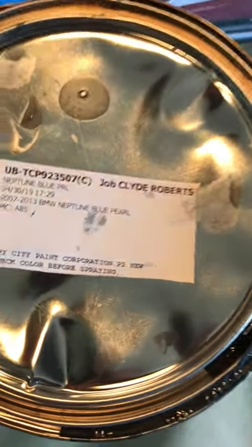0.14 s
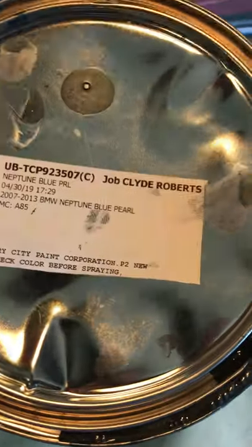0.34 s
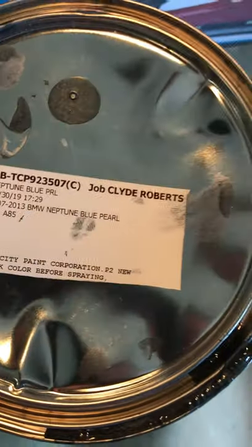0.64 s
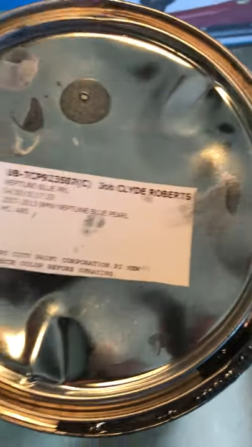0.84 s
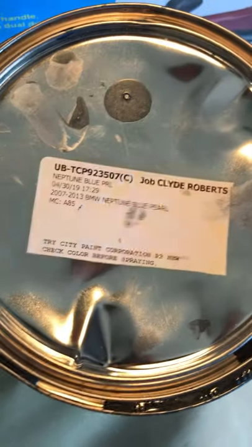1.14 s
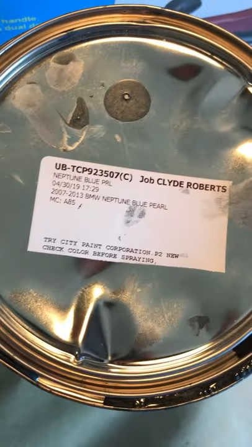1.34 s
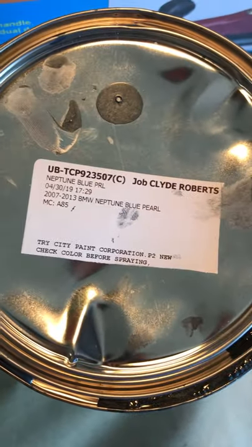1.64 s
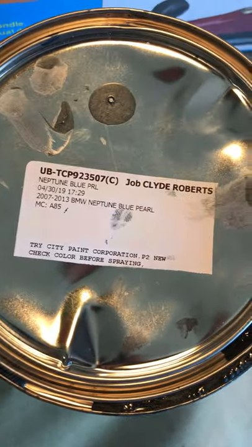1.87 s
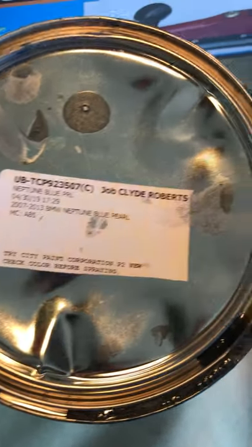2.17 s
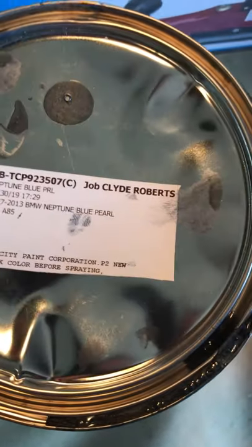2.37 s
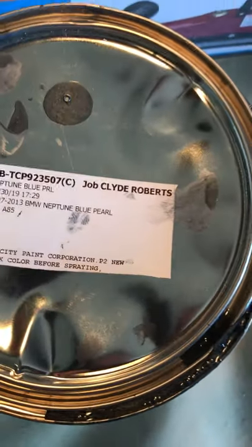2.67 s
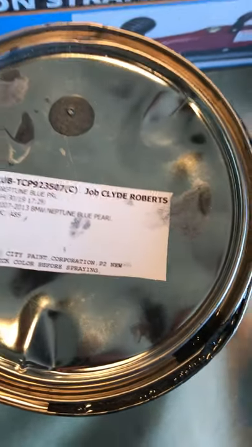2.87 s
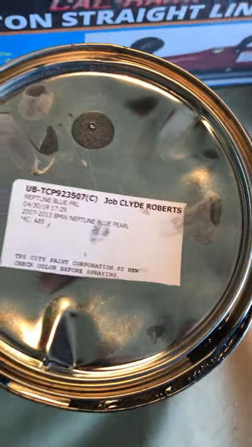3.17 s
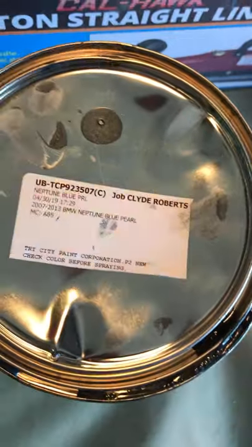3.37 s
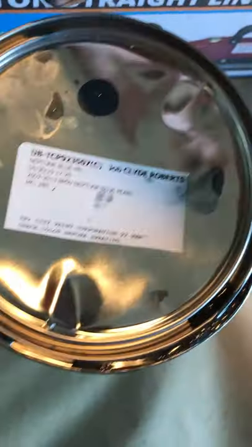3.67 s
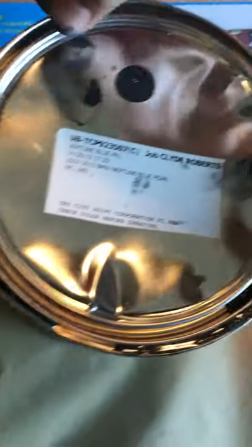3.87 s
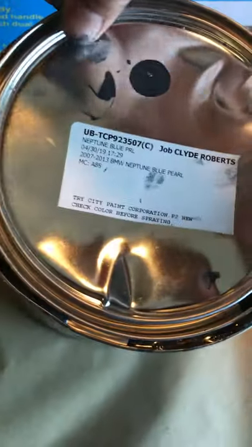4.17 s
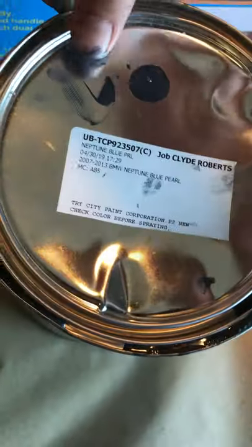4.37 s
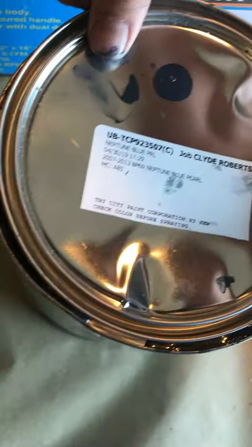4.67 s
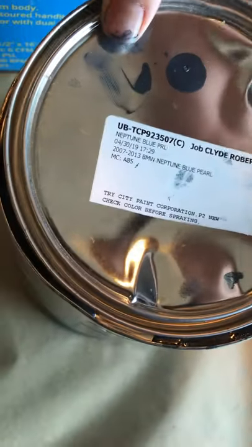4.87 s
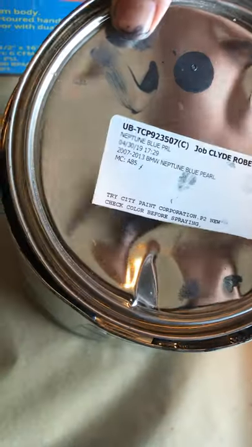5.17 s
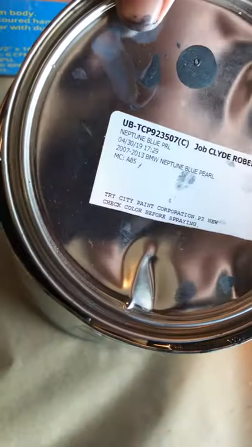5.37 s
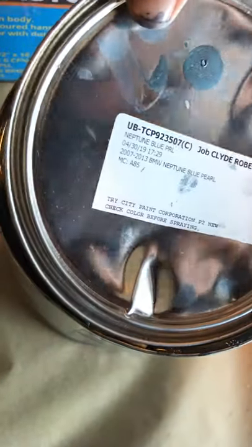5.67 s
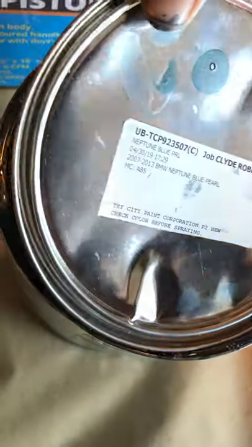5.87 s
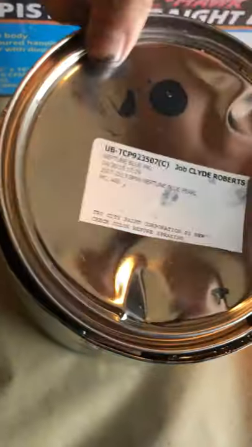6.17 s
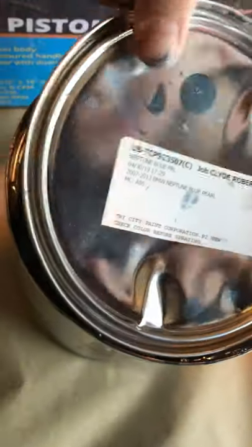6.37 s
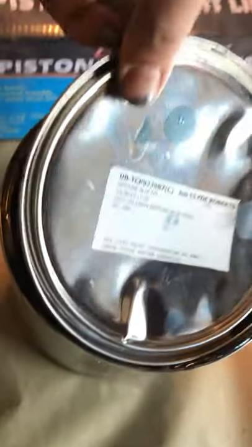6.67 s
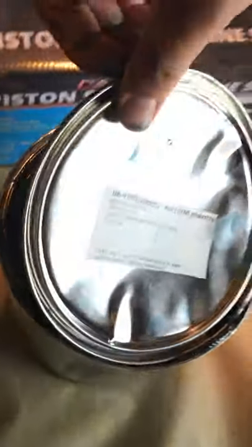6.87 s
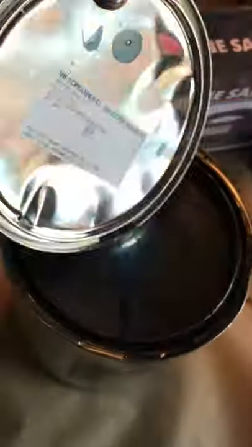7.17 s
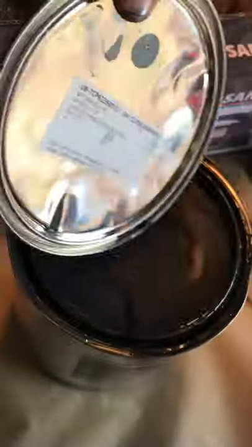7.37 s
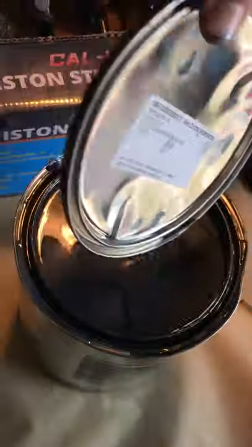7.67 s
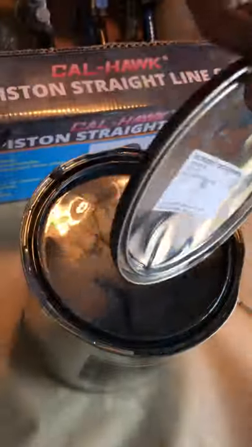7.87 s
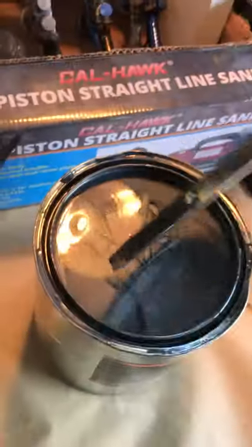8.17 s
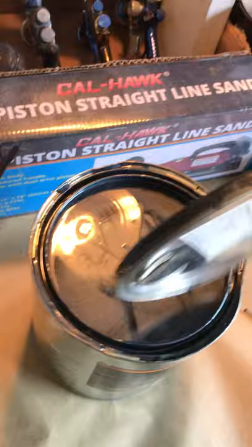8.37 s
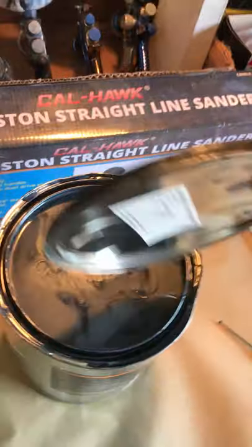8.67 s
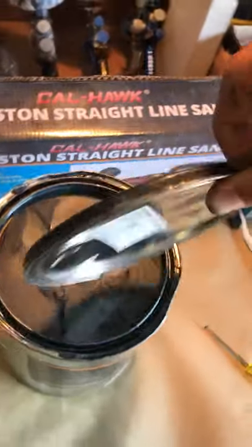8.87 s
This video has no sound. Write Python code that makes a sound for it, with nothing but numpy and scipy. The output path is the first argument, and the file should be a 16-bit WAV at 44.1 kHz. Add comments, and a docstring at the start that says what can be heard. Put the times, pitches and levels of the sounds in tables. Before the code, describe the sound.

Close dull tinny thumps and clicks on a metal can, a short clatter, quiet rubbing, then a sharp lid pop in a quiet workshop.

```python
"""A quiet workshop: a hand works the lid off a metal paint can, close to a phone microphone.
Each contact is a burst of tiny slips that rings modes of the tin and bench and adds clicks and ticks.
Rubs are shaped noise with a hum, among them a low bench ring and a short tap; faint rings join them.
A tool clatters a little further off, with more of the room's echo, as noise bursts without a ring.
Behind it all lie a low lumpy rumble and the hiss of the room, both shaped noise."""
import sys
import numpy as np
from scipy import signal
from scipy.fft import rfft, irfft
from scipy.io import wavfile
from scipy.ndimage import uniform_filter1d

SR = 44100
rng = np.random.default_rng(int(sys.argv[2]) if len(sys.argv) > 2 else 0)


def transcribe(signal):
    """Save signal, clipped to [-1, 1], as a 16-bit WAV file at the path in sys.argv[1]."""
    frames = np.atleast_2d(signal).T
    limited = np.clip(frames, -1, 1)
    pcm = np.round(limited * 32767).astype(np.int16)
    wavfile.write(sys.argv[1], SR, pcm)


N = 398223  # samples, about 9 s

# Contacts of hand, lid and can. Each row: start in seconds, then ring, thump, click and tick
# levels in dB, and t60 of the slips in seconds.
CONTACTS = [(0.154, -30, -35, -37.5, -55, 0.079), (0.355, -27.5, -23, -41, -61, 0.083),
            (0.367, -18, -12, -38.5, -69, 0.077), (0.422, -33, -39, -34, -44, 0.055),
            (0.509, -36, -43, -45.5, -57, 0.075), (0.771, -18.5, -17, -33.5, -45, 0.057),
            (1.208, -33.5, -42, -31, -35.5, 0.066), (1.234, -58, -68, -38.5, -64, 0.058),
            (1.738, -42.5, -55, -46, -51, 0.026), (1.848, -26, -53, -43.5, -55, 0.093),
            (1.862, -23.5, -37, -33, -61, 0.064), (1.871, -18, -45, -62, -69, 0.092),
            (2.073, -33, -43, -51, -60, 0.044), (2.192, -46.5, -47, -48.5, -55.5, 0.031),
            (2.688, -39.5, -38, -47.5, -77, 0.12), (2.925, -35.5, -46.5, -41.5, -44, 0.033),
            (4.566, -39, -46, -54, -60, 0.13), (4.96, -9.5, -19, -39.5, -45, 0.028),
            (5.295, -44, -48, -44, -29.5, 0.0084), (5.755, -42, -48, -47, -45, 0.04),
            (5.907, -41, -50, -44, -45, 0.045), (6.978, -40, -55, -34, -34.5, 0.016),
            (6.987, -36, -33.5, -45, -59, 0.039), (7.013, -44, -47, -28, -41, 0.029),
            (7.066, -15.5, -21.5, -17, -19, 0.04), (7.072, -6, -16, -58, -48, 0.085),
            (7.165, -17.5, -19.5, -21.5, -20.5, 0.055), (7.459, -77, -76, -48.5, -85, 0.048),
            (8.631, -51, -41.5, -46, -54, 0.12)]
# Pitches heard at chosen moments, interpolated between them. Each row: time in seconds, pitch
# favoured in the tin in Hz, pitch favoured in the bench in Hz, tin pitch ratio, rim pitch in Hz.
PITCHES_HEARD = [(.36, 570, 110, 1.085, 2480), (.77, 640, 220, 0.94, 3500), (1.21, 660, 200, 0.98, 5710),
                 (1.9, 710, 110, 0.97, 4140), (4.9, 790, 298, 1.045, 2400), (7.07, 1152, 293, 1.01, 5400)]
# Modes of the tin with the lid seated. Each row: pitch in Hz, relative level in dB,
# t60 in seconds when free of the hand.
SEATED_MODES = [(574.8, 1.5, 0.026), (670, -1.5, 0.089), (750.7, -5.5, .14), (850, -6, 0.11),
                (996.5, -3.5, 0.13), (1193, -4, 0.095), (1415, -6, 0.11), (1573, -7, 0.095),
                (1660, -7, 0.12), (1834, -9, 0.079)]
# Modes of the lid as it springs free. Each row: pitch in Hz, relative level in dB, t60 in seconds.
FREE_MODES = [(400, -12, .11), (759, -15, .11), (820, -21, .24), (980, -5, .03), (1114, -16, .17),
              (1244, 0, .095), (1394, -21, .13), (1680, -27, .22), (2440, -32, .12), (3381, -29, .13),
              (3660, -20, .035)]
# Modes of the open can. Each row: pitch in Hz, relative level in dB, t60 in seconds.
OPEN_MODES = [(725, -7, .13), (829, -12, .14), (1122, -3, .14), (1200, 0, .04), (2186, -12, .21),
              (2514, -20, .14), (3200, -13, .09)]
# Modes of the bench. Each row: pitch in Hz, relative level in dB, t60 in seconds before shortening.
BENCH_MODES = [(106.4, -5.5, 0.11), (224.4, 0.7, 0.062), (341, -1.5, 0.068), (403, 1, 0.11)]
# Colour of a click. Each row: frequency in Hz, relative level in dB.
CLICK_COLOUR = [(1800, -5.5), (3000, -10), (5500, -14), (9000, -29)]
# Colour of a tick. Each row: frequency in Hz, relative level in dB.
TICK_COLOUR = [(3500, -7), (6500, 11.5), (13000, 9), (16000, -8.5)]
# Faint rings of bench and tin. Each row: start in seconds, level in dB, favoured pitch in Hz.
FAINT_RINGS = [(4.951, -28, 800), (5.283, -39.5, 950), (5.326, -41.5, 1000), (5.467, -44.5, 1000),
               (5.916, -37.5, 1000), (8.745, -43.5, 400), (8.878, -38.5, 257), (8.995, -43, 258)]
# Sticky paint lets go in tiny ticks. Each row: start in seconds, level in dB.
PAINT_TICKS = [(7.293, -54), (7.338, -55.5), (8.264, -49), (8.56, -50), (8.597, -51), (8.796, -50),
               (8.878, -56.5)]
# Rubs, plus a low ring of the bench (150 Hz) and one very short hissing tap (8.4 ms).
# Each row: start in seconds, length in seconds, hiss level in dB, hum level in dB, hum pitch in Hz.
RUBS = [(0.785, 0.13, -72, -34, 150), (1.95, 0.16, -62.5, -67, 4000), (2.66, 0.095, -64, -48, 730),
        (4.55, 0.52, -67, -56.5, 840), (2.07, 0.087, -60, -43.5, 940), (7.054, 0.24, -69, -33, 126.2),
        (6.13, 0.18, -74, -53.5, 1020), (6.374, 0.1, -62.5, -47.5, 1000), (6.888, 0.23, -48, -54.5, 3500),
        (7.155, 0.0084, -29, -51, 3700), (8.265, 0.2, -57.5, -59, 3650), (8.3, 0.52, -67, -57, 1325),
        (8.54, 0.22, -61, -51.5, 783), (8.27, 0.75, -65, -55.5, 334), (0.372, 0.06, -48.5, -64, 4200)]
# Colour of skin on metal. Each row: frequency in Hz, relative level in dB per Hz.
SKIN_COLOUR = [(880, -16), (1500, 8.5), (3150, 0.5), (8570, -3.5), (15700, -14), (16000, -40)]
# Bounces of the tool. Each row: start in seconds, level in dB, t60 of the slips in seconds.
CLATTER = [(3.242, -14.5, 0.07), (3.25, -17, 0.1), (3.257, -9.5, 0.046), (3.266, -12.5, 0.038),
           (3.29, -28, 0.047), (3.32, -33, 0.039)]
# Colour of the tool. Each row: frequency in Hz, relative level in dB per Hz.
TOOL_COLOUR = [(110, -22), (280, -1.5), (480, -9), (1020, -5), (1600, -11), (3290, -6.5), (16000, -35)]
# The holding hand. Each row: time in seconds, skin hiss level in dB, murmur level of the tin in dB.
HANDLING = [(0, -62, -53.5), (.6, -67.5, -61), (6.4, -66, -60.5), (6.9, -57.5, -57), (7.4, -70, -65),
            (9.03, -65, -58.5)]
# Echo of the workshop. Each row: frequency in Hz, t60 in seconds.
SHOP_DECAY = [(1000, 0.32), (9000, 0.26)]
# Level of the rumble. Each row: time in seconds, level in dB.
RUMBLE_LEVEL = [(0, -38.5), (5.5, -44), (9.03, -45.5)]
# Colour of the rumble. Each row: frequency in Hz, relative level in dB per Hz.
RUMBLE_COLOUR = [(22, -36), (39, -7), (60, 9), (90, 3.5), (150, -11), (260, -60.5)]
# Colour of the room hiss. Each row: frequency in Hz, relative level in dB per Hz.
HISS_COLOUR = [(80, -38), (130, -0.5), (240, -2.5), (450, -11.5), (800, -13.5), (1700, -23.5), (4000, -32),
               (10500, -42), (11500, -34), (15700, -40), (15950, -75)]

LID_FREE_S, CAN_OPEN_S = 7.04, 7.1  # the lid springs free, then the can is open
RING_TIME = 0.49  # share of the listed t60 left to the seated tin and the bench
RATTLE_DB, RATTLE_T60 = -42.5, .22  # the lid chatters on after each push; t60 in seconds
RIM_DB, RIM_T60 = -5, .016  # the seated rim's ping: dB relative to the click, t60 in seconds
HISS_DB = -52.5
EDGE_HZ = 16500  # upper band limit
LEAD = 256  # samples of run-up before each contact


def contact(s, ring_db, thump_db, click_db, tick_db, slip_t60):
    """One firm push and its slips ring the tin; the bench takes the slow part of the push."""
    t, slips = slipping(slip_t60)
    when, *heard = np.transpose(PITCHES_HEARD)
    ring_hz, thump_hz, bend, rim_hz = (np.interp(s, when, column) for column in heard)

    push = 3. * signal.unit_impulse(len(t), LEAD)
    rattle = peaked(slipping(RATTLE_T60, grain_db=3.5)[1], RATTLE_DB)
    force = peaked(slips, -24) + push + rattle

    modes = SEATED_MODES if s < LID_FREE_S else FREE_MODES if s < CAN_OPEN_S else OPEN_MODES
    if modes is SEATED_MODES:  # the pressing hand bends the lid: pitch and decay rate scale together
        tin = ringing(modes, bend * t, reach(modes, ring_hz, 11.0), RING_TIME)
    else:
        tin = ringing(modes, t)
    bench = ringing(BENCH_MODES, t, reach(BENCH_MODES, thump_hz, 12.4), RING_TIME)
    responses = np.array([tin, bench])
    ring, thump = signal.fftconvolve(force[None], responses, axes=1)[:, :len(t)]

    # harder contacts tick higher: a treble tilt in dB per octave about 8 kHz
    hard_db = 1.1 * np.clip(tick_db - click_db, -3., 18.)
    tick_colour = [(hz, db + hard_db * np.log2(hz / 8000)) for hz, db in TICK_COLOUR]
    # each click gets its own random uneven colour
    uneven_colour = np.transpose([np.arange(40) * SR / 80, 4.4 * rng.standard_normal(40)])
    click = peaked(coloured(coloured(slips, uneven_colour), CLICK_COLOUR), click_db)
    bright = click + peaked(coloured(slips, tick_colour), tick_db)
    if modes is SEATED_MODES:  # the rim pings at its pitch and an octave below
        rim = ringing([(rim_hz / 2, 0, RIM_T60), (rim_hz, 0, RIM_T60)], t)
        bright = bright + peaked(signal.fftconvolve(slips, rim)[:len(t)], click_db + RIM_DB)
    return (peaked(ring, ring_db) + peaked(thump, thump_db) + bright)[:-4 * LEAD]


def faint_rings():
    """A faint cluster of slips rings the bench and seated tin modes near one pitch."""
    out, modes = np.zeros(N), BENCH_MODES + SEATED_MODES
    for s, db, hz in FAINT_RINGS:
        t, slips = slipping(0.045)
        response = ringing(modes, t, reach(modes, hz, 23.0), RING_TIME)
        ring = signal.fftconvolve(slips, response)[:len(t) - 4 * LEAD]
        add(out, s - LEAD / SR, peaked(ring, db))
    return out


def paint_ticks():
    """Sticky paint lets go in dry treble bursts with no ring."""
    out = np.zeros(N)
    for s, db in PAINT_TICKS:
        tick = peaked(coloured(slipping(.03)[1], TICK_COLOUR), db)
        add(out, s - LEAD / SR, tick[:-4 * LEAD])
    return out


def rubs():
    """Rubs, a low bench ring and a short tap: shaped hiss, and modes kept humming by uneven noise."""
    out, skin = np.zeros(N), noise(SKIN_COLOUR, 1.5, 1.5)
    drag = rng.standard_normal(N) * gain_of(3.3 * wavering(top_hz=50))
    for s, length, hiss_db, hum_db, hz in RUBS:
        t = np.arange(round(length * SR)) / SR
        here = slice(round(s * SR), round(s * SR) + len(t))
        if s < LID_FREE_S and SEATED_MODES[0][0] < hz < SEATED_MODES[-1][0]:
            # the whole seated lid answers
            response = ringing(SEATED_MODES, t, reach(SEATED_MODES, hz, 18.0), RING_TIME)
        else:
            t60 = .013 + 2000 / hz ** 2  # all but the lowest pitches die quickly
            response = ringing([(hz, 0, t60), (1.06 * hz, -3, t60)], t)
        hum = evened(signal.fftconvolve(drag[here], response)[:len(t)])
        sound = gain_of(hiss_db) * skin[here] + gain_of(hum_db) * hum
        add(out, s, sound * signal.windows.tukey(len(t), .6))
    return out


def clatter():
    """Quick bounces of a tool that has no ring of its own: coloured bursts of slips."""
    out = np.zeros(N)
    for s, db, slip_t60 in CLATTER:
        bounce = peaked(coloured(slipping(slip_t60, grain_db=3.5)[1], TOOL_COLOUR), db)
        add(out, s - LEAD / SR, bounce[:-4 * LEAD])
    return out


def handling():
    """The holding hand hisses faintly, and its drag keeps the heavily damped tin murmuring."""
    hiss_db, murmur_db = along(HANDLING)
    drag = rng.standard_normal(N) * gain_of(2.5 * wavering(top_hz=12))
    t = np.arange(8192) / SR
    tin = ringing(SEATED_MODES, t, reach(SEATED_MODES, 780, 11.0), longer=0.13)
    murmur = evened(signal.oaconvolve(drag, tin)[:N])
    return gain_of(hiss_db) * noise(SKIN_COLOUR, 2.2, 1.5) + gain_of(murmur_db) * murmur


def shop(x):
    """The workshop's echo: sparse taps of random sign, each band dying at its own speed."""
    taps = np.zeros(SR // 2)
    at = np.arange(300, SR // 2 - 20, 20)
    taps[at + rng.integers(0, 20, len(at))] = rng.choice([-1., 1.], len(at))
    hz, t, z = signal.stft(taps, SR, nperseg=256)
    decay = gain_of(-60 * t / read(SHOP_DECAY, hz)[:, None])
    tail = signal.istft(z * decay, SR, nperseg=256)[1]
    return signal.fftconvolve(x, tail / np.linalg.norm(tail))[:N]


def room_tone():
    """A low rumble, lumpy from its slowly wavering level, under the steady hiss."""
    lumpy = gain_of(2.0 * wavering(top_hz=8)) * rng.standard_normal(N)
    rumble = gain_of(along(RUMBLE_LEVEL)[0]) * evened(coloured(lumpy, RUMBLE_COLOUR))
    return rumble + gain_of(HISS_DB) * noise(HISS_COLOUR, 1.3, 0.45)


def slipping(slip_t60, grain_db=8.0):
    """Time in seconds, and a dying cluster of tiny slips after first contact: grainy noise."""
    t = np.arange(12288) / SR
    a, b = rng.standard_normal((2, len(t)))
    grains = a * gain_of(grain_db * b - 60 * t / max(slip_t60, .004))
    return t, np.roll(grains * np.minimum(t / 0.0005, 1), LEAD)


def ringing(modes, t, weights_db=0, longer=1):
    """The response of a set of dying modes to one soft blow; neighbours start in opposite directions."""
    hz, db, t60 = np.transpose(modes)[:, :, None]
    sign = (-1.) ** np.arange(len(modes))[:, None]
    rise = (1 - np.exp(-t * hz / 0.16)) ** 2
    decay = gain_of(db + weights_db - 60 * t / (t60 * longer))
    return (sign * rise * decay * np.sin(2 * np.pi * hz * t)).sum(0)


def reach(modes, centre_hz, slope_db):
    """Favours the modes nearest to a centre pitch, falling by slope_db per octave."""
    return -slope_db * abs(np.log2(np.transpose(modes)[0] / centre_hz))[:, None]


def noise(spectrum, patchy_db, swell_db):
    """Random short-time spectra with drifting patches and a flicker shared by all bins; rms 1."""
    frames, hz = N // 256 + 5, np.fft.rfftfreq(1024, 1 / SR)
    a, b, patches = rng.standard_normal((frames, 513, 3)).T
    swell = evened(uniform_filter1d(patches[:30].mean(0), size=6))
    patches = uniform_filter1d(patches, size=10, axis=0)  # across bins
    patches = evened(uniform_filter1d(patches, size=12, axis=1))  # across frames
    level_db = read(spectrum, hz)[:, None] + patchy_db * patches + swell_db * swell
    z = (a + 1j * b) * gain_of(level_db)
    return evened(signal.istft(z, nperseg=1024, noverlap=768)[1][:N])


def coloured(x, spectrum):
    """Filters x to a spectrum given as frequency in Hz and level in dB."""
    gain = gain_of(read(spectrum, np.fft.rfftfreq(len(x), 1 / SR)))
    return irfft(rfft(x) * gain, len(x))


def wavering(top_hz):
    """A slow random curve of rms 1."""
    return evened(coloured(rng.standard_normal(N), [(top_hz, 0), (3 * top_hz, -60)]))


def gain_of(db):
    """Amplitude factor of a level in dB."""
    return 10 ** (np.asarray(db) / 20)


def evened(x):
    """Scales x to rms 1."""
    return x / np.sqrt(np.mean(x ** 2) + 1e-20)


def peaked(x, db):
    """Scales a hit so that its loudest 4 ms reach the level db."""
    return gain_of(db) * x / np.sqrt(uniform_filter1d(x ** 2, size=176).max() + 1e-20)


def read(points, hz):
    """Interpolates a table over log frequency."""
    f, value = np.transpose(points)
    return np.interp(np.log(hz + 1), np.log(f + 1), value)


def along(rows):
    """Each column of a timed table, interpolated at every sample."""
    s, *columns = np.transpose(rows)
    return [np.interp(np.arange(N) / SR, s, c) for c in columns]


def add(mix, s, sound):
    """Adds a sound to the mix, starting at s seconds."""
    part = mix[round(s * SR):][:len(sound)]
    part += sound[:len(part)]


def scene():
    """The can up close, the tool further off with more echo, and the room behind."""
    near, tool = rubs() + faint_rings() + paint_ticks(), clatter()
    for row in CONTACTS:
        add(near, row[0] - LEAD / SR, contact(*row))
    wet = shop(gain_of(-20.5) * near + gain_of(-15.0) * tool)
    return (near + tool + wet + handling() + room_tone())[None]


def record(dry):
    """The microphone: a soft limit on the loudest peaks, then the band limit."""
    held = .95 * np.tanh(dry / .95)
    lowpass = signal.firwin(511, EDGE_HZ, window=("kaiser", 9), fs=SR)
    return signal.oaconvolve(held, lowpass[None], "same")


dry = scene()
out = record(dry)
transcribe(out)
```